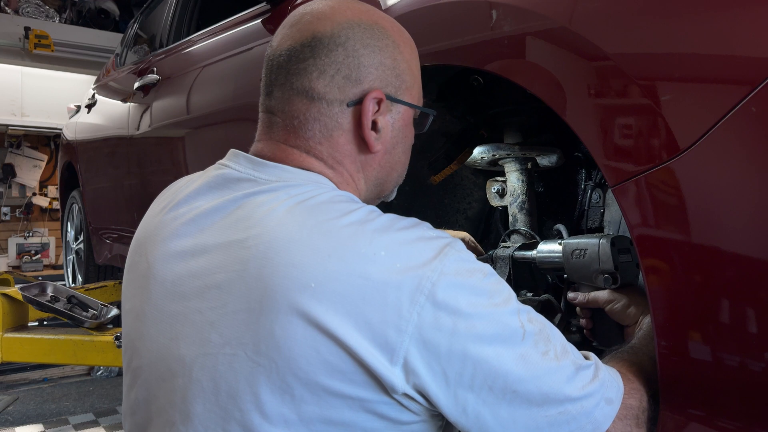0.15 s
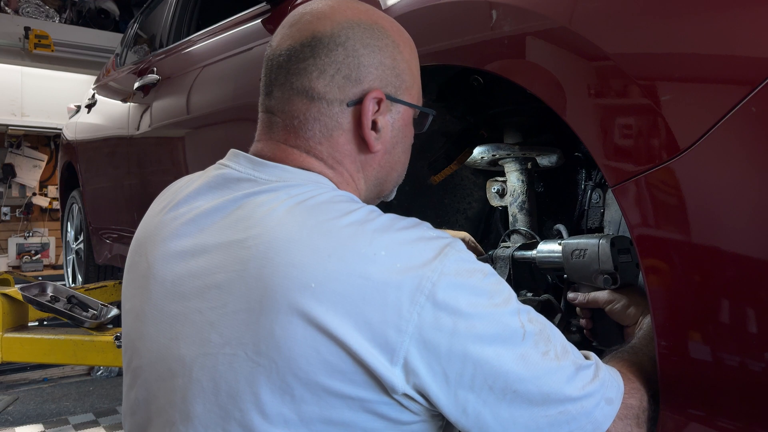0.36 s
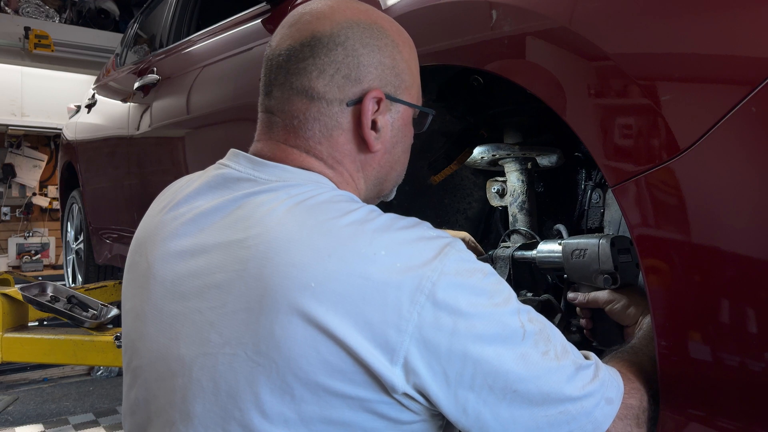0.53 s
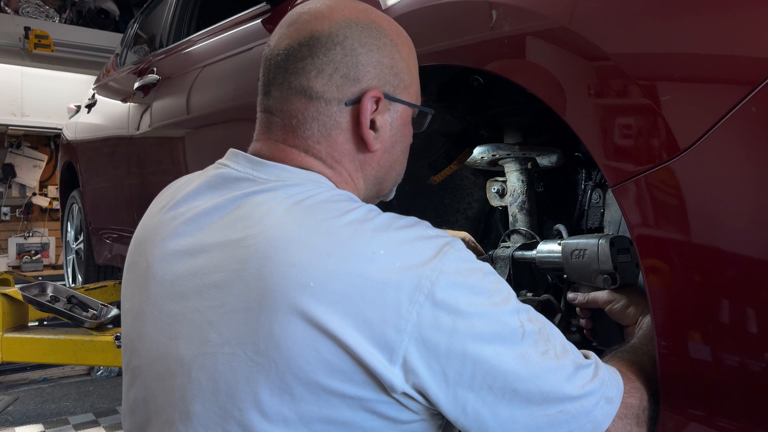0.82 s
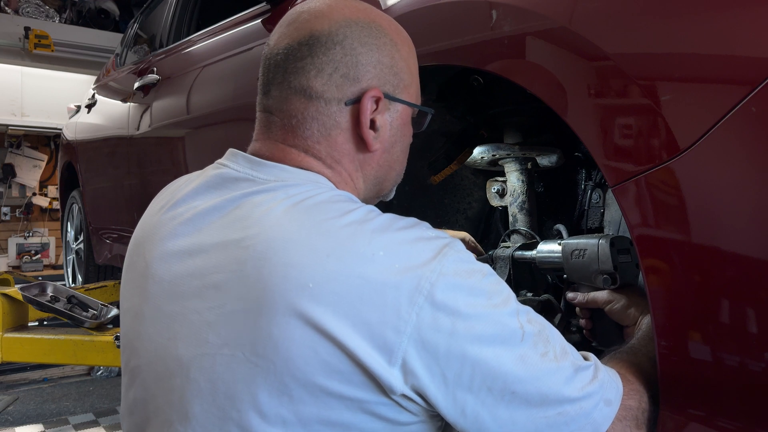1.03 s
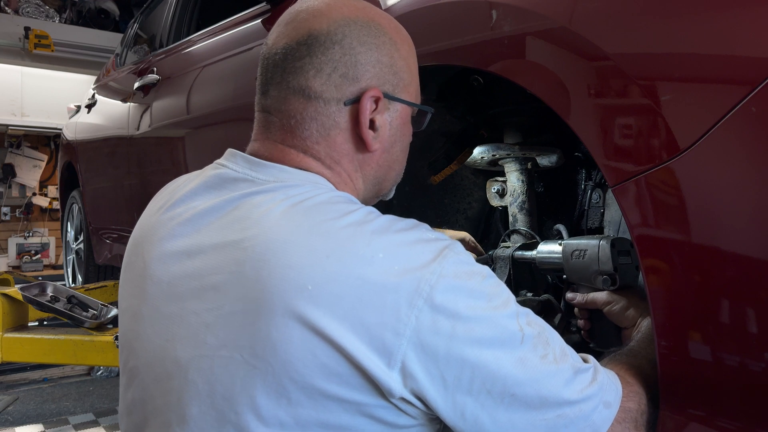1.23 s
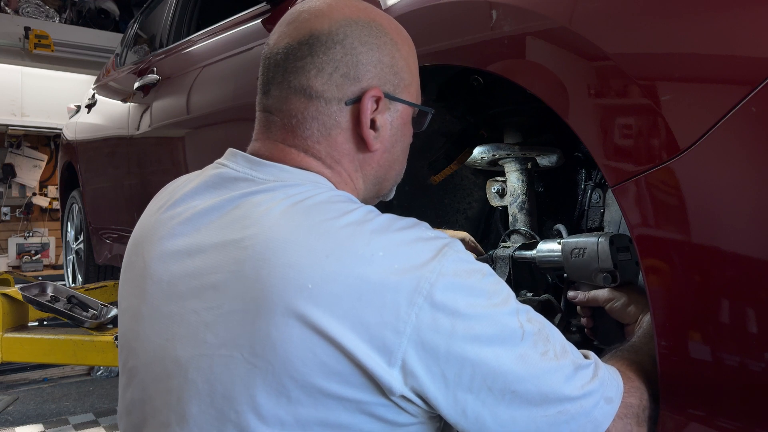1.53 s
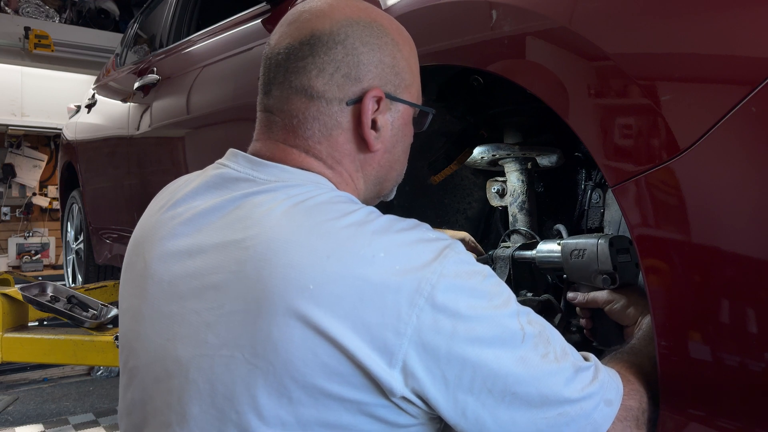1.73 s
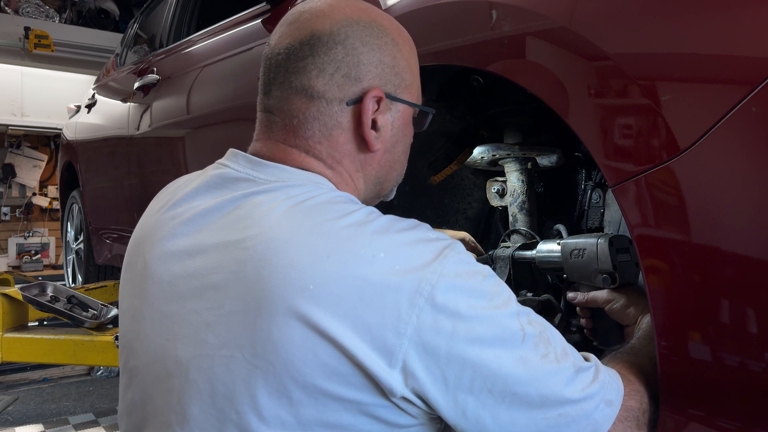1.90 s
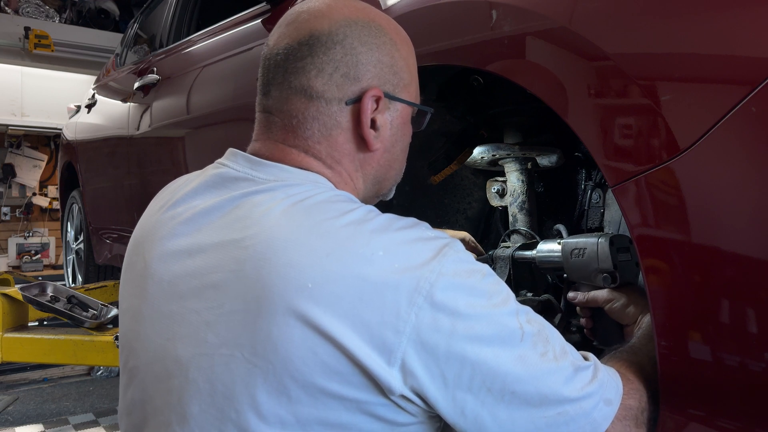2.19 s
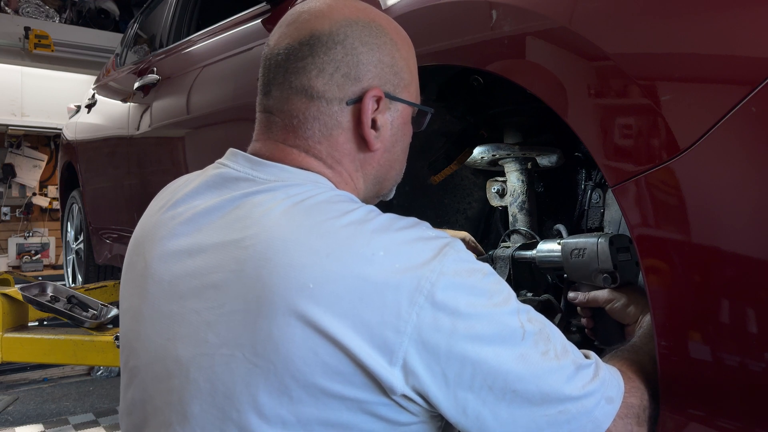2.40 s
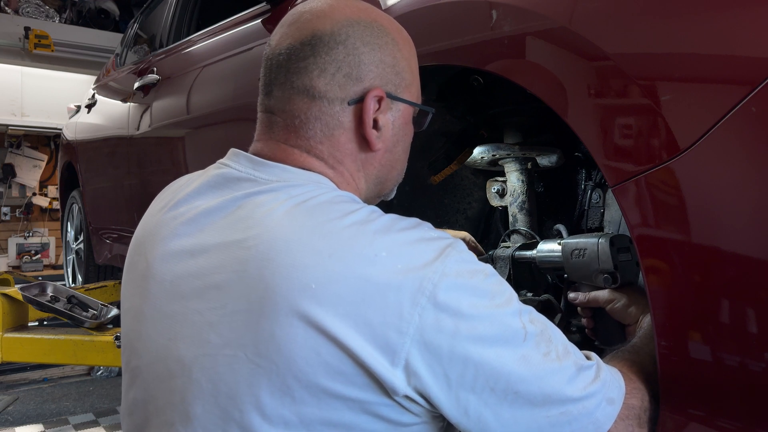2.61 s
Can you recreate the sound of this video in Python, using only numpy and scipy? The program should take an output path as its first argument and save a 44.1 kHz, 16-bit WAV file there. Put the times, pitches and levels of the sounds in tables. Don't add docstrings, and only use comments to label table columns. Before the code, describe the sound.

A pneumatic impact wrench hammers close to the microphone, already running at the start, with ringing steel blows and puffing exhaust air; it stops, then gives two more bursts, with a short garage echo.

```python
import sys
import numpy as np
from scipy import signal
from scipy.fft import rfft, irfft
from scipy.io import wavfile
from scipy.ndimage import uniform_filter1d

SR = 44100
rng = np.random.default_rng(int(sys.argv[2]) if len(sys.argv) > 2 else 0)


def amp(db):
    return 10 ** (np.asarray(db, float) / 20)


def write(x):
    x = np.atleast_2d(x).T
    wavfile.write(sys.argv[1], SR, np.round(np.clip(x, -1, 1) * 32767).astype(np.int16))


N = 121275
PRE = 4410
TOTAL = N + PRE

# (frequency [Hz], level [dB per Hz])
ROOM_TONE = [(30, -27), (150, 9), (500, -17), (2000, -30), (6000, -28), (16000, -37)]
# (frequency [Hz], width [Hz], level [dB])
MACHINE_HUM = [
    (179, 12, -54),
    (630, 12, -70),
    (1120, 15, -63),
]
# (frequency [Hz], t60 [s])
GARAGE_DECAY = [(150, 0.3), (500, 0.25), (2000, 0.25), (7000, 0.26), (11000, .19), (15000, 0.11)]

# (start [s], end [s], frequency [Hz], level [dB])
VALVE_WHISTLES = [
    (1.317, 1.337, 2750, -52),
    (1.324, 1.342, 1420, -45),
    (2.134, 2.14, 2750, -51),
    (2.138, 2.167, 1360, -44),
    (2.67, 2.75, 13200, -49),
]
# (start [s], end [s], hiss level [dB])
TRIGGER_HELD = [
    (-.1, 1.045, -34),
    (1.31, 1.968, -29),
    (2.131, 2.68, -29),
]
# (frequency [Hz], level [dB per Hz])
AIR_SPECTRUM = [(410, -55), (700, -1.5), (1680, 1), (5190, -4), (11100, -15.5), (16000, -24)]

# (time [s], level [dB])
SPIN_UPS = [(0.0418, -16), (0.1344, -13), (0.2255, -13.5), (0.3156, -12.5), (0.4045, -12.5),
            (0.4945, -14.5), (0.5847, -13.5), (0.675, -13.5), (0.7642, -12), (0.8593, -15), (0.9674, -12),
            (1.365, -11.9), (1.4432, -12), (1.506, -11), (1.58, -17.5), (1.6584, -16), (1.752, -13),
            (1.8333, -22.6), (1.9153, -19.5), (2.1723, -9.5), (2.2503, -12.5), (2.3097, -14), (2.371, -11),
            (2.4397, -21.0), (2.5048, -11.5), (2.5654, -18), (2.6285, -12)]
# (time [s], level [dB])
VANE_PUFFS = [(0.0639, -22.5), (0.083, -19.5), (0.1582, -22), (0.1682, -22.5), (0.1769, -21),
              (0.22, -27), (0.2491, -21), (0.2592, -21.5), (0.2685, -18.5), (0.3397, -20.5),
              (0.3492, -21.9), (0.357, -20.5), (0.4014, -32), (0.4288, -19), (0.4382, -22.5),
              (0.4469, -19.5), (0.5297, -25.5), (0.5384, -19.5), (0.5931, -22.5), (0.6208, -23.0),
              (0.6301, -24), (0.7121, -24), (0.7209, -21.5), (0.7737, -24), (0.7809, -17.5),
              (0.7879, -21.5), (0.803, -22), (0.8134, -20), (0.8224, -20), (0.856, -24), (0.9005, -23),
              (0.9095, -24), (0.9183, -22), (0.9523, -24), (0.9637, -27), (1.0016, -24),
              (1.3736, -16.5), (1.3804, -15.5), (1.398, -24), (1.4053, -16.5), (1.4113, -20),
              (1.4397, -21), (1.4514, -20), (1.4592, -24.4), (1.4659, -18.5), (1.4714, -26),
              (1.5163, -26), (1.525, -19.5), (1.5322, -24.3), (1.539, -22.7), (1.6024, -20),
                    (1.6105, -18), (1.682, -17.1), (1.6905, -21), (1.7053, -16), (1.7386, -27),
                    (1.7635, -20), (1.7726, -17), (1.7808, -21), (1.789, -28), (1.8451, -25.5),
                    (1.8537, -20.5), (1.9278, -24.5), (2.1695, -27), (2.1847, -10.5), (2.1934, -14),
                    (2.2009, -24), (2.2071, -28), (2.2126, -15), (2.2442, -17), (2.2588, -16),
                    (2.2658, -17), (2.2718, -19.5), (2.2776, -17), (2.3195, -23.8), (2.328, -24),
                    (2.3348, -22.5), (2.3406, -16.5), (2.3818, -27), (2.3897, -19), (2.3963, -17),
                    (2.402, -16), (2.4073, -24.5), (2.4442, -21), (2.4527, -19.8), (2.4643, -16.4),
                    (2.4695, -21), (2.514, -14.5), (2.5207, -24), (2.5269, -17.5), (2.532, -20),
                    (2.5752, -20), (2.5824, -21), (2.5883, -21), (2.5939, -17.5), (2.6262, -24),
                    (2.6383, -17), (2.6462, -24), (2.6531, -21), (2.6599, -24.3)]
# (start [s], length [s], level [dB], slope [dB per s], rate [puffs per s])
COASTING = [
    (1.04, .3, -28.5, -71, 40),
]
# (frequency [Hz], width [Hz], thump level [dB], puff level [dB])
EXHAUST_PIPE = [(177.5, 79, 0.5, 0.5), (359, 52, -10.5, 2), (898, 135, -4, 6)]

# (time [s], peak [dB], later ticks [dB], rattle gap [s])
CAM_CATCHES = [(0.0395, -8.5, 1.5, 0.0068), (0.134, -3.5, 3, 0.0072), (0.2264, -3, -1, 0.0092),
               (0.3194, -6, 3.5, 0.0079), (0.408, -6, 3, 0.0088), (0.4985, -6, 0, 0.0063),
               (0.591, -6.5, -1.5, 0.0058), (0.6826, -4.5, -10, 0.011), (0.7758, -0.5, -0.5, 0.0075),
               (0.871, -7, -1, 0.0079), (0.9654, -2.5, -1.5, 0.0052), (1.3633, -4, 3, 0.017),
               (1.4447, -0.5, -9, 0.0068), (1.51, -2.5, -2, 0.0059), (1.5883, -3.5, 0, 0.0083),
               (1.668, -3, -1, 0.0092), (1.7505, -5.5, 3, 0.0071), (1.834, -8, 1.5, 0.0075),
               (1.918, -5, 2.5, 0.0061), (2.174, -13.5, -2.5, 0.014), (2.252, 0, 1, 0.0069),
               (2.3132, -5.5, 1.5, 0.0083), (2.377, 3, -13, 0.011), (2.444, -4, -8, 0.0084),
               (2.5062, -1, -5, 0.0074), (2.5688, -4, -4, 0.0099), (2.6344, 0, -8, 0.0065)]
# (time [s], peak [dB], treble [dB], body [dB])
HAMMER_BLOWS = [(0.0871, 4.5, -12.5, -2.5), (0.18, 1, -11.5, 0.5), (0.2725, 2.5, -9.5, -2.5),
                (0.3633, 5, -8, -2), (0.4536, 2.5, -13, 1), (0.5454, 2, -10.5, 0.5), (0.637, 2, -7.5, 3.5),
                (0.7297, 3, -10.5, 2.5), (0.8238, 5.5, -11, -3.5), (0.9199, 9.5, -16, -7),
                (1.0141, 3.5, -9.5, 3), (1.4129, 4, -10.5, -12), (1.474, 2.5, -12, -1.5),
                (1.543, 4, -9, -13), (1.626, 2.5, -9, -2.5), (1.7058, 1.5, -3.5, -2.5),
                (1.7897, 5, -15.5, -22), (1.8709, 4.5, -11.5, -11), (1.9635, 3.5, -8.5, -2),
                (2.2204, 3, -8.5, -0.5), (2.281, 2, -9, -0.5), (2.3453, 3, -9, -6), (2.4079, 2.5, -6, -4),
                (2.4708, 0, -5, -6), (2.5347, 1, -7, -12), (2.597, 2, -5, -5.5), (2.666, -3, 1, 1)]
# (time [s], peak [dB], treble [dB], body [dB])
PREVIOUS_BLOW = (-0.02, 5, 4, 8)
# (time [s], peak [dB],
# treble [dB], body [dB])
STRAY_HITS = [(1.0705, -14.5, -9, 7), (1.0852, -16.5, -7.5, -10), (1.135, -45, -10, -2),
              (1.163, -44, -11, 0), (1.195, -26, -21, 2), (1.1971, -10, -16, 0.5), (1.2003, -13, -20, -6),
              (1.205, -18, -30, -9), (1.28, -38, -13, 7), (1.34, -13, -18, 3), (1.3773, -5, -6.5, -7),
              (2.142, -44, -16, -2), (2.1615, -22.5, -5.5, -9.5), (2.1937, -0.5, -2.5, 2.5)]
# (frequency [Hz], level [dB], t60 [s])
STEEL_MODES = [(1818, -9, .06), (2151, -8, .055), (2405, -5.5, 0.074), (2970, -3, 0.11), (3296, -2, .055),
               (3820, -9, 0.039), (4204, -4.5, 0.031), (5880, -6.5, .04), (7570, -7.5, .03),
               (11200, -15, .025)]
# (frequency [Hz], level [dB per Hz])
CRACK_SPECTRUM = [(590, -10.5), (1000, -7.5), (2100, -10), (3960, -1), (7000, -10.5), (9100, -28),
                  (15400, -120)]
# (frequency [Hz], level [dB per Hz])
SNAP_SPECTRUM = [(500, -14), (1300, 3), (3500, -0.5), (8000, -7.5), (16000, -1)]
# (frequency [Hz], level [dB per Hz])
SIZZLE_SPECTRUM = [(5000, -13.5), (7400, -3), (10500, 2), (13500, -5), (16000, -4.5)]
# (frequency [Hz], level [dB per Hz])
BODY_SPECTRUM = [(210, -10.5), (350, -4), (959, -5.5), (4180, 1), (6850, -11.5), (11100, -20), (16000, -69)]


def colour(x, points):
    f, db = np.transpose(points)
    bins = np.log(np.fft.rfftfreq(len(x), 1 / SR) + 1)
    gain = amp(np.interp(bins, np.log(f), db))
    return irfft(rfft(x) * gain / np.sqrt(np.mean(gain ** 2)), len(x))


def train(times, dbs):
    out = np.zeros(TOTAL)
    places = np.round(np.ravel(times) * SR).astype(int) + PRE
    np.add.at(out, places, amp(np.ravel(dbs)))
    return out


def burst(clicks, rise_s, t60, grain_db=3.0):
    t = np.arange(8000) / SR
    shape = (1 - np.exp(-t / rise_s)) * amp(-60 * t / t60)
    power = signal.oaconvolve(clicks ** 2, shape ** 2)[:len(clicks)]
    wander = np.sqrt(50) * uniform_filter1d(rng.standard_normal(len(clicks)), size=50)
    return np.sqrt(abs(power)) * amp(grain_db * wander) * rng.standard_normal(len(clicks))


def ring(x, hz, width):
    r = np.exp(-np.pi * width / SR)
    return 2 * signal.lfilter([1 - r], [1, -r * np.exp(2j * np.pi * hz / SR)], x).real


def clock():
    return (np.arange(TOTAL) - PRE) / SR


def room_tone():
    return amp(-62) * colour(rng.standard_normal(TOTAL), ROOM_TONE)


def distant_machine():
    noise = rng.standard_normal(TOTAL)
    return sum(amp(db) * ring(noise, hz, width) * np.sqrt(SR / width / np.pi)
               for hz, width, db in MACHINE_HUM)


def garage(x):
    taps = np.zeros(SR // 2)
    count = (len(taps) - 201) // 20
    places = np.arange(200, len(taps) - 20, 20) + rng.integers(0, 20, count)
    taps[places] = rng.choice([-1., 1.], count)
    hz, t, z = signal.stft(taps, SR, nperseg=256)
    f, t60 = np.transpose(GARAGE_DECAY)
    band_t60 = np.interp(np.log(hz + 1), np.log(f), t60)[:, None]
    tail = signal.istft(z * amp(-60 * t / band_t60), SR, nperseg=256)[1]
    return signal.fftconvolve(x, tail / np.linalg.norm(tail))[:len(x)]


def valve():
    t, noise = clock(), rng.standard_normal(TOTAL)
    out = np.zeros(TOTAL)
    for start, end, hz, db in VALVE_WHISTLES:
        fade = np.clip(np.minimum(t - start, end - t) / 0.004, 0, 1)
        width = hz / 15
        out += amp(db) * fade * ring(noise, hz, width) * np.sqrt(SR / width / np.pi)
    return out


def air():
    t = clock()
    held = np.zeros(TOTAL)
    for start, end, db in TRIGGER_HELD:
        swell_db = -30 * np.clip(1 - (t - start) / 0.049, 0, 1)
        release = np.clip((end - t) / 0.032, 0, 1)
        held += amp(db + swell_db) * (t > start) * release
    return colour(held * rng.standard_normal(TOTAL), AIR_SPECTRUM)


def exhaust_push(clicks, size):
    pulse = -np.hanning(size) / size
    return signal.oaconvolve(clicks, pulse)[:TOTAL] + 0.0049 * burst(clicks, 0.0017, 0.085)


def motor():
    puffs = train(*np.transpose(VANE_PUFFS))
    thumps = train(*np.transpose(SPIN_UPS))
    for start, length, db, slope, rate in COASTING:
        t = np.arange(0, length, 1 / rate)
        thumps += train(start + t + 0.003 * rng.standard_normal(len(t)), db + slope * t)
    thump_push, puff_push = exhaust_push(thumps, 80), exhaust_push(puffs, 66)
    pipe = np.zeros(TOTAL)
    for hz, width, thump_db, puff_db in EXHAUST_PIPE:
        resonance = amp(thump_db) * ring(thump_push, hz, width) + amp(puff_db) * ring(puff_push, hz, width)
        pipe += resonance * SR / width / 2
    stall_s, stall_db = 0.0245, -15.5
    stops = train(np.array(HAMMER_BLOWS)[:, 0] + 0.003, 0)
    stall = signal.oaconvolve(stops, np.ones(round(stall_s * SR)))[:TOTAL]
    choked = pipe * amp(stall_db * uniform_filter1d(stall, size=100))
    return choked + amp(-11.5) * colour(burst(puffs + thumps, 0.0013, 0.019), AIR_SPECTRUM)


def rattle():
    s, db, late_db, gap = np.transpose(CAM_CATCHES)
    s = s[:, None] + gap[:, None] * [-0.43, 0.072, 0.98, 1.62]
    db = db[:, None] + [-10.5, 0.5, -3.0, -6.0] + late_db[:, None] * [0, 0, 1, 1]
    clicks = train(s, db + 0.82 * rng.standard_normal(s.shape))
    crack = amp(-5) * colour(burst(clicks, 0.0014, 0.029), CRACK_SPECTRUM)
    body = amp(-11) * colour(burst(clicks, 0.0043, 0.071), BODY_SPECTRUM)
    sizzle = amp(-11) * colour(burst(clicks, 0.00083, 0.033), SIZZLE_SPECTRUM)
    return crack + body + sizzle + amp(-41.5) * ring(clicks, 4300, 300)


def steel(times, dbs, treble):
    luck = rng.standard_normal((len(times), len(STEEL_MODES), 2))
    seat = np.digitize(luck[..., 1], [-.5, .5]) - 1
    out = np.zeros(TOTAL)
    for k, (hz, db, t60) in enumerate(STEEL_MODES):
        level = dbs + db + 2.5 * luck[:, k, 0] + (hz > 6000) * (treble + 6)
        for j in (-1, 0, 1):
            clicks = train(times, level - 200 * (seat[:, k] != j))
            strike = burst(clicks, 0.000094, 0.045)
            out += ring(strike, hz * (1 + 0.02 * j), 1.93 / t60) * np.sqrt(t60 * SR)
    return out


def hits():
    blows = np.array(HAMMER_BLOWS)
    cycle = np.diff(blows[:, 0], append=9)
    bounce_db = -12.5 + 0.4 * rng.standard_normal(len(cycle))
    bounces = blows + np.transpose([0.247 * cycle, bounce_db, 0 * cycle, 0 * cycle])
    s, db, treble, body = np.vstack([blows, [PREVIOUS_BLOW], bounces[cycle < .12], STRAY_HITS]).T
    crack = amp(-7.5) * colour(burst(train(s, db), 0.0004, 0.024, grain_db=1.5), CRACK_SPECTRUM)
    snap_noise = burst(train(*blows.T[:2]), 0.00025, 0.011, grain_db=0.5)
    snap = amp(-7.5) * colour(snap_noise, SNAP_SPECTRUM)
    sizzle = colour(burst(train(s, db + treble), 0.00054, 0.026, grain_db=1.5), SIZZLE_SPECTRUM)
    shake = amp(-12.5) * colour(burst(train(s, db + body), 0.0046, 0.082), BODY_SPECTRUM)
    return crack + snap + sizzle + shake + amp(-29.5) * steel(s, db + body / 2, treble)


def scatter(x):
    z = signal.stft(x, nperseg=256)[2]
    patches = uniform_filter1d(rng.standard_normal(z.shape[::-1]), size=5, axis=0)
    patches = uniform_filter1d(patches, size=6, axis=1)
    return signal.istft(z * amp(2.0 * patches.T / patches.std()), nperseg=256)[1][:len(x)]


def scene():
    background = room_tone() + distant_machine() + valve()
    tool = air() + motor() + scatter(rattle() + hits())
    return (tool + amp(-15) * garage(tool) + background)[None, PRE:]


def roll_off(x):
    return signal.sosfilt(signal.butter(12, 16960, fs=SR, output="sos"), x)


def record(dry):
    x = signal.sosfilt(signal.butter(3, 110, "high", fs=SR, output="sos"), dry)
    ceiling = 0.84
    limited = ceiling * np.tanh(x / ceiling)
    edge = signal.firwin(201, 15900, window=("kaiser", 7), fs=SR)
    mix = signal.oaconvolve(limited, edge[None], "same")
    return roll_off(mix)


dry = scene()
out = record(dry)
write(out)
```